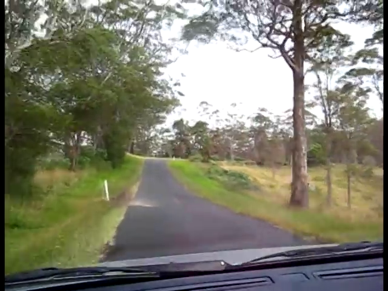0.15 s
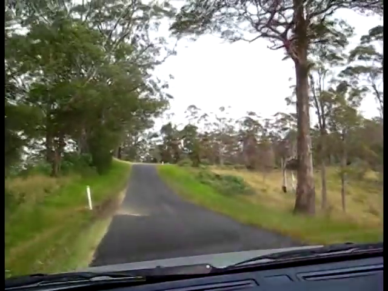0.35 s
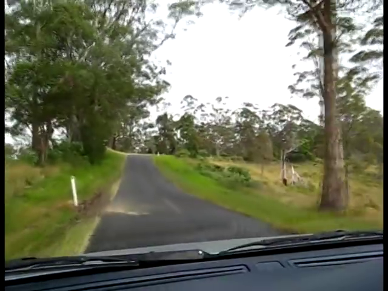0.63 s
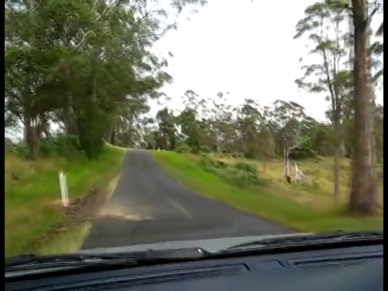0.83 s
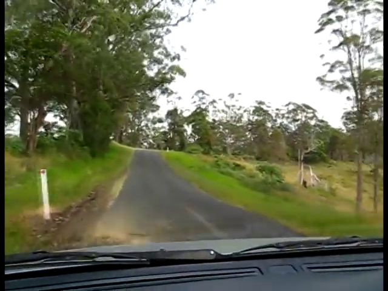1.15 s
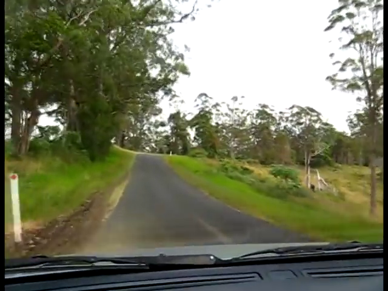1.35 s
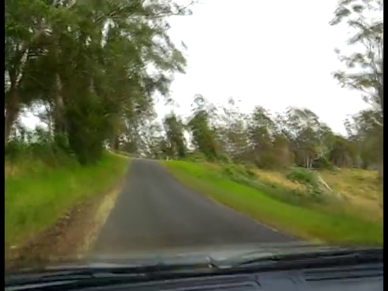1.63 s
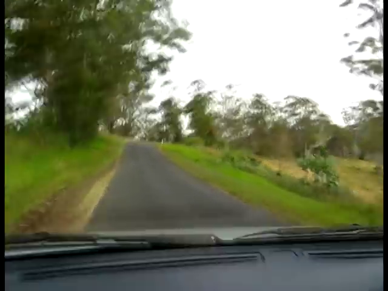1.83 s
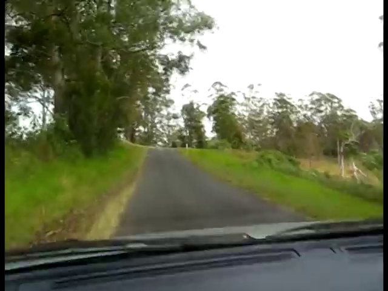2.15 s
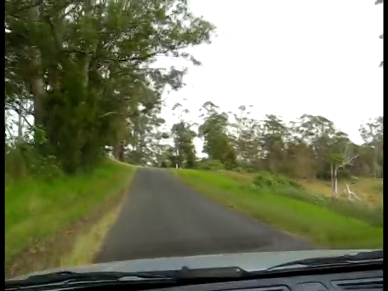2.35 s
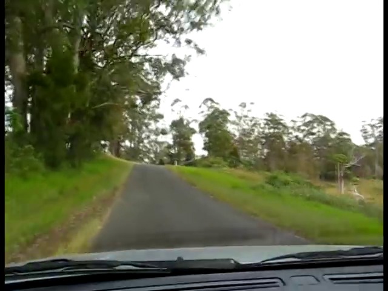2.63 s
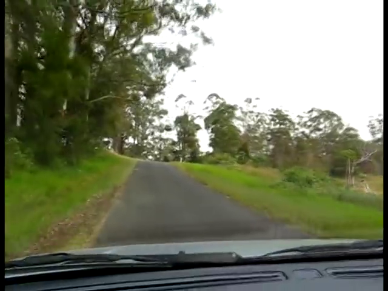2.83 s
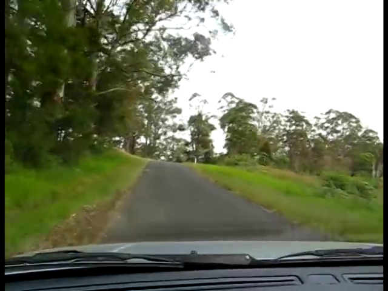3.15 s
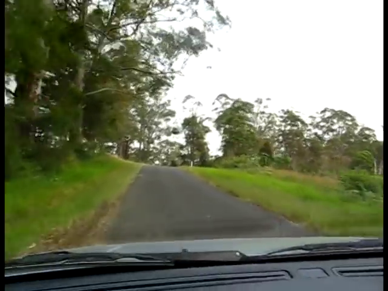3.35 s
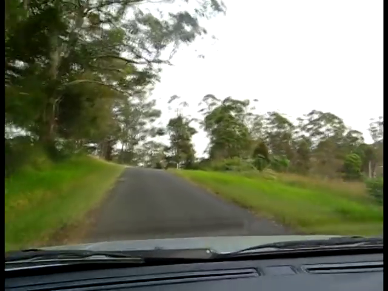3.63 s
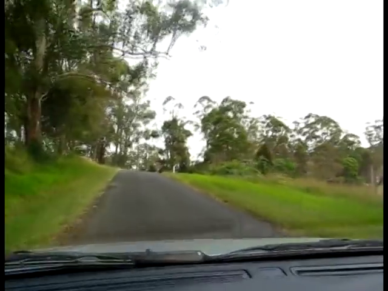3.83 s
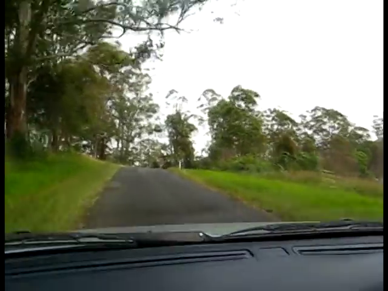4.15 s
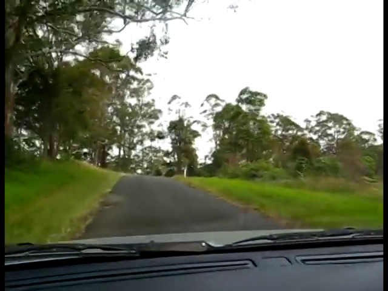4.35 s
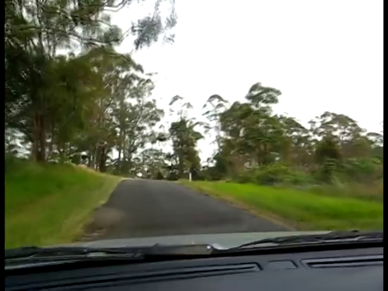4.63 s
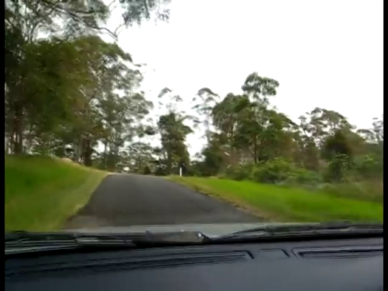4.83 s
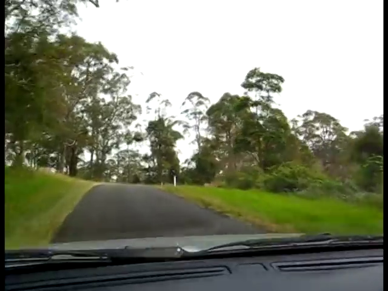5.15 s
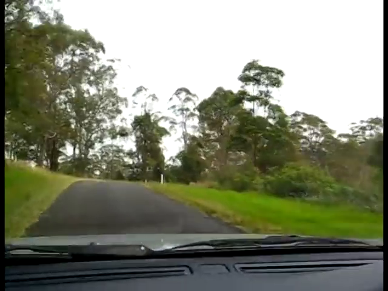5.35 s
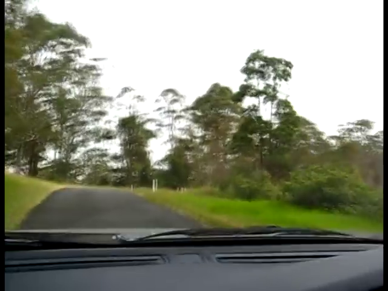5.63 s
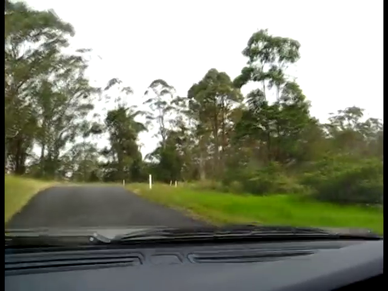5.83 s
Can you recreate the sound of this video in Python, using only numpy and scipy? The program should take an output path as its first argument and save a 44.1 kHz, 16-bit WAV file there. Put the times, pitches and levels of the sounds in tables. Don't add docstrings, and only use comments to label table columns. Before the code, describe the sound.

Inside a car on a rough country road, heavy tyre rumble and engine hum, a sharp stone snap, then rattling trim knocks.

```python
import sys
import numpy as np
from scipy import signal
from scipy.fft import rfft, irfft, next_fast_len
from scipy.io import wavfile
from scipy.ndimage import uniform_filter1d, map_coordinates

SR = 44100
rng = np.random.default_rng(int(sys.argv[2]) if len(sys.argv) > 2 else 0)


def to_wav(sig):
    pcm = np.clip(np.atleast_2d(sig), -1, 1) * 32767
    pcm = np.round(pcm).astype(np.int16)
    wavfile.write(sys.argv[1], SR, pcm.T)


def ratio_of_db(decibels):
    return 10 ** (np.asarray(decibels, float) / 20)


N = 263963
TIME_S = np.arange(N) / SR
HIT_S = np.arange(SR // 8) / SR


def unit(x):
    return x / np.sqrt(np.mean(x ** 2) + 1e-20)


def curves(rows):
    s, *cols = np.transpose(rows)
    return [np.interp(TIME_S, s, c) for c in cols]


def wobble(rate):
    knots = rng.standard_normal(int(N * rate / SR) + 4)
    return map_coordinates(knots, [np.arange(N) * rate / SR])


def humps(s, height, half_s):
    return np.sum(height * np.exp(-((TIME_S - s) / half_s) ** 2), axis=0)


def rush(spectrum, patchy_db):
    z = signal.stft(rng.standard_normal(N + 512), nperseg=512)[2]
    field = uniform_filter1d(rng.standard_normal(z.shape), 6, 0)
    field = uniform_filter1d(field, 10, 1)
    patchy = signal.istft(z * ratio_of_db(patchy_db * unit(field)), nperseg=512)[1][:N]
    m = next_fast_len(N + 8192)
    hz, db = np.transpose(spectrum)
    gain_db = np.interp(np.log(np.fft.rfftfreq(m, 1 / SR) + 1), np.log(hz + 1), db)
    return unit(irfft(rfft(patchy, m) * ratio_of_db(gain_db), m)[:N])


def ring(modes, smear, rise):
    hz, db, t60 = np.transpose(modes)[:, :, None]
    strength, detune = rng.standard_normal((2, len(hz), 1))
    drift = smear * np.cumsum(rng.standard_normal((len(hz), len(HIT_S))), axis=1)
    level = ratio_of_db(db + 1.5 * strength - 60 * HIT_S / np.maximum(t60, 0.005))
    tones = level * np.sin(2 * np.pi * hz * (1 + 0.017 * detune) * HIT_S + drift)
    return np.sum(tones, axis=0) * (1 - np.exp(-HIT_S / rise))


def place(out, s, hit):
    out[round(s * SR):][:len(hit)] += hit


# (time [s], depth [dB])
DUCKS = [(0.15, 8), (0.39, 15.5), (1.2, 2.5), (1.5, 4.5), (1.69, 3.5), (1.766, 8), (2.034, 8.5), (2.385, 2),
         (2.83, 1), (3.24, 2.5), (3.84, 3), (4.482, 4), (5.179, 5), (5.398, 6), (5.491, 4.5), (5.71, 5)]


def ducking():
    attack_s, hold_s, recover_db_per_s = 0.0027, 0.046, 39.5
    s, depth_db = np.transpose(DUCKS)[:, :, None]
    since = TIME_S - s
    left_db = depth_db - recover_db_per_s * np.maximum(since - hold_s, 0)
    return -np.sum(np.clip(since / attack_s, 0, 1) * np.maximum(left_db, 0), axis=0)


# (frequency [Hz], density [dB per Hz])
SELF_NOISE = [(1500, -27.5), (3000, -3.5), (5000, -1), (6500, -10), (8000, -33), (10000, -60)]


def self_noise():
    return ratio_of_db(-60.5) * rush(SELF_NOISE, patchy_db=2.0)


# (time [s], level [dB], half length [s])
GRAVEL = [(0.14, -58, .02), (1, -45, 0.083), (1.422, -43, 0.045), (1.69, -38.5, 0.06), (1.745, -45, .025),
          (1.983, -39, 0.083), (2.29, -43.5, 0.08), (4.421, -53, 0.052), (4.85, -44.5, 0.16),
          (5.03, -54, .04), (5.385, -42.5, 0.033)]


def gravel():
    s, db, half_s = np.transpose(GRAVEL)[:, :, None]
    crunch = ratio_of_db(3.4 * wobble(150)) * rush([(900, -38.5)] + HISS[1:], patchy_db=0.5)
    return humps(s, ratio_of_db(db), half_s) * unit(crunch)


# (time
# [s], level [dB], frequency [Hz], t60 [s])
PINGS = [(.3966, -11, 850, 0.028), (.3958, -27, 5400, .012), (0.397, -23, 4000, .012),
         (.4006, -29, 5000, .009), (0.9443, -23, 2080, .035), (.9448, -24.5, 3130, 0.024),
         (0.9458, -30, 2650, .035), (.9452, -49, 7800, .06), (.9535, -32, 3220, 0.027),
         (.951, -26, 1800, .035), (.96, -31.5, 2300, 0.046), (1.6804, -24, 1800, .05),
         (1.7222, -27, 2250, .025), (1.7235, -41, 5000, .02), (1.7508, -10, 477, 0.026),
         (1.751, -22, 1900, 0.027), (1.7555, -29, 3270, 0.032), (1.765, -33, 1760, 0.035),
         (5.3875, -31, 1810, 0.036)]


def pings():
    out = np.zeros(N + SR)
    for s, db, hz, t60 in PINGS:
        place(out, s, ring([(hz, db, t60)], smear=0.083, rise=0.0014))
    return out[:N]


# (time [s], level [dB], frequency [Hz], t60 [s])
PANEL = [(.133, -21, 810, .02), (.1418, -17, 750, 0.018), (1.338, -17, 910, 0.026),
         (1.605, -21, 900, 0.034), (1.618, -21.5, 966, 0.072), (1.6385, -8.5, 850, 0.025),
         (1.661, -12, 930, 0.026), (2.366, -17, 790, 0.018), (5.177, -18.5, 790, 0.025)]


def door_panel():
    out = np.zeros(N + SR)
    for s, db, hz, t60 in PANEL:
        place(out, s, ring([(hz, db, t60)], smear=0.012, rise=0.0006))
    return out[:N]


# (time [s], peak [dB], thud [dB], tick [dB], loudest part [Hz])
RATTLE = [(0.134, -32, 8, -18, 1950), (0.921, -31.5, 4, -19, 2410), (0.9455, -29, -4, -19.5, 2150),
          (0.9504, -31, -2, -19, 2250), (0.9565, -34, -1, -25, 3270), (0.966, -34, -2, -18, 2320),
          (0.998, -33, 14, -22, 1980), (1.066, -36, 20, -12, 3100), (1.15, -45, 5, -18, 1850),
          (1.338, -39, 16, -25, 1680), (1.437, -32, 15, -12.5, 1590), (1.606, -51, 24, -24, 1630),
          (1.6398, -28, 6, -12.5, 2180), (1.6435, -31, 4, -14, 3400), (1.6608, -27, 12, -15.5, 2460),
          (1.6728, -29.5, 24, -11, 2570), (1.677, -29, 0, -17, 2700), (1.6809, -25, 9, -22, 1760),
          (1.6862, -34, 3, -18, 2500), (1.6985, -28, 6, -26, 1820), (1.723, -30, -9, -7, 2280),
          (1.752, -29, -5, -15, 1890), (1.7552, -27, 8, -11.5, 1810), (1.763, -37, -6, -17, 3270),
          (1.803, -35, 12, -18, 1390), (1.8847, -31, -6, -11, 1830), (1.898, -40, -6, -10, 3180),
          (1.9414, -30.5, -1, -21, 1610), (1.9776, -31, -4, -18, 1750), (2.0084, -29, 0.5, -16, 1940),
          (2.366, -38, 26, -16, 1600), (5.177, -34, 10, -12.5, 1620), (5.386, -30, -2, -20, 1770)]
# (frequency [Hz], level [dB])
TRIM = [(1800, 0.5), (2250, -1.5), (2750, -7), (3250, -1.5), (3900, -10.5)]
# (frequency [Hz], level [dB])
THUD = [(250, 7), (450, 4.5), (700, 7), (900, 2), (1100, -13.5)]
# (frequency [Hz], density [dB per Hz])
TICK = [(1200, -17.5), (2200, 2.5), (4200, 4.5), (5700, -2.5), (7500, -10.5), (9000, -28.5), (10500, -35.5),
        (11500, -120)]


def trim_knocks():
    out = np.zeros(N + SR)
    t60 = 0.051
    grit = np.pad(rush(TICK, patchy_db=-2.5), (0, SR))
    tick_shape = ratio_of_db(-60 * HIT_S / t60) * (1 - np.exp(-HIT_S / 0.0014))
    for s, db, thud_db, tick_db, part_hz in RATTLE:
        trim_modes = [(hz, level, t60) for hz, level in TRIM + [(part_hz, 4)]]
        thud_modes = [(hz, level, 0.51 * t60) for hz, level in THUD]
        rattle = ring(trim_modes, smear=0.085, rise=0.0015)
        thud = ratio_of_db(thud_db + 0.5) * ring(thud_modes, smear=0.004, rise=0.00049)
        tick = ratio_of_db(tick_db + 13.5) * grit[round(s * SR):][:len(HIT_S)] * tick_shape
        place(out, s - 0.001, ratio_of_db(db - 10.0) * (rattle - thud + tick))
    return out[:N]


# (time [s], peak [dB])
SNAP = [
    (0.395, -18),
    (0.3971, -17),
    (0.4006, -21),
]
# (frequency [Hz], level [dB], t60 [s])
PAN = [(1870, -11, 0.023), (2520, -9.5, 0.018), (3100, -8, 0.014), (3760, -3, 0.0099), (4100, -7, 0.0086),
       (5250, -11, 0.008), (5940, -15, 0.008), (7060, -17, 0.009)]
# (frequency
# [Hz], level [dB], t60 [s])
PAN_BODY = [(850, -17, 0.025), (1180, -12, 0.016), (1306, -15, 0.041)]


def stone():
    out = np.zeros(N + SR)
    place(out, SNAP[0][0], -ring(PAN_BODY, smear=0.004, rise=0.0011))
    for s, db in SNAP:
        skin = ring(PAN, smear=0.059, rise=0.00063)
        carrier = np.sin(2 * np.pi * 7500 * HIT_S)
        spit = ratio_of_db(-22 - 60 * HIT_S / 0.0081) * rng.standard_normal(len(HIT_S)) * carrier
        place(out, s, ratio_of_db(db - 2.0) * (skin + spit))
    return out[:N]


# (time [s], crankshaft turns [Hz], throttle [dB])
CRANK = [(0.0, 25.0, -5), (0.8, 25.6, -4), (1.6, 25.1, -6), (2.0, 27, -6), (2.3, 29.8, -4), (2.8, 32.6, -1),
         (3.05, 34.6, 0), (4.0, 34.8, 0), (4.8, 34.5, 0), (5.2, 34.5, 0), (5.6, 32.5, -7), (6.0, 31.2, -7)]
# (multiple of the turns, level [dB])
ORDERS = [(2, -28.5), (3, -44), (4, -28), (6, -35.5), (8, -39.5), (10, -41), (11, -36), (12, -37.5)]
# (frequency [Hz], width [Hz], lift [dB])
BOOM = [(124, 20, 4), (400, 89, 7)]


def engine():
    turns_hz, throttle_db = curves(CRANK)
    angle = 2 * np.pi * np.cumsum(turns_hz) / SR
    hum = np.zeros(N)
    for k, db in ORDERS:
        boom_db = sum(lift_db / (1 + (2 * (k * turns_hz - hz) / width_hz) ** 2)
                      for hz, width_hz, lift_db in BOOM)
        pull_db = throttle_db * (2.1 if k > 9 else 0.063)
        unsteady_db = 1.5 * wobble(6) + 2 * wobble(20)
        tone = np.sin(k * angle + 0.45 * wobble(5))
        hum += ratio_of_db(db + boom_db + pull_db + unsteady_db) * tone
    return hum * ratio_of_db(ducking() + 2.5)


# (time [s], floor heave [dB], body shudder [dB], half length [s])
BUMPS = [(0.145, 10, -0.5, 0.042), (0.336, 5.5, 3.5, 0.046), (0.653, 5, 3.5, 0.04), (0.98, -1, 7, 0.017),
         (1.03, 0.5, 1, .04), (1.292, 4, 1, 0.042), (1.494, 5, 0.5, 0.03), (1.644, 7, 1.5, 0.019),
         (1.69, 6, 7, 0.0088), (1.94, 7.5, 0.5, 0.065), (2.032, 16, 0.5, 0.031), (2.336, 5.5, 2, 0.052),
         (2.492, -5, 5.5, 0.024), (3.182, 3, 0.5, 0.026), (3.31, -4, 4.5, 0.024), (3.382, 4.5, -5.5, 0.033),
         (3.5, 15, -2, 0.02), (3.99, 1.5, -4.5, 0.046), (4.46, -1.5, 0, .03), (4.794, 4.5, 0, 0.13),
         (4.946, -1, 7.5, 0.017), (5.146, 3, 5, 0.029), (5.464, 6.5, 2, 0.086), (5.767, 7, 3.5, 0.025),
         (5.88, 0, 0, .08), (3.504, -1.5, 1, 0.16), (2.607, 1, -4, 0.072), (5.985, -12, 8, 0.017),
         (0.047, -5, -2, 0.09), (1.1, 0.5, 1, 0.091), (3.56, -0.5, -1.5, 0.088), (4.25, -0.5, 1.5, 0.091),
         (5.02, 0, -1, .07)]


def bumps():
    s, heave_db, shudder_db, half_s = np.transpose(BUMPS)[:, :, None]
    return humps(s, heave_db, half_s), humps(s, shudder_db, half_s)


# (time [s], coarseness [dB])
ROAD = [(0.0, -0.5), (0.6, 0), (1.1, 0), (1.55, 0), (2.2, 0.5), (2.8, 2), (3.3, 2), (3.75, 2.5), (4.0, 0),
        (4.4, 3.5), (4.85, 0), (5.35, 1.5), (5.6, -2), (5.99, 1.5)]
# (level [dB], follows the surface [dB/dB], follows the ducking [dB/dB])
PATHS = [
    (-19.5, -0.66, 0.67),
    (-19, 0.79, 0.83),
    (-29.5, 1.2, 0.74),
    (-42.5, .9, 0.52),
]
# (frequency [Hz], density [dB per Hz])
RUMBLE = [(7, -26.5), (12, -14.5), (24, -2), (32, 1), (41, 5), (50, -1), (60, -6.5), (90, -5), (120, -29),
          (200, -120)]
# (frequency [Hz], density [dB per Hz])
DRONE = [(53, -32), (90, 0.5), (140, 1), (168, -2.5), (221, -7.5), (257, -5), (313, -10), (376, -8),
         (423, -11), (480, -15), (620, -48.5), (1060, -120)]
# (frequency [Hz], density [dB per Hz])
ROAR = [(280, -34), (480, -5), (511, -1), (591, 2.5), (640, 0), (839, 3.5), (971, 0.5), (1060, -4.5),
        (1200, -8.5), (1350, -15.5), (1690, -46.5), (2860, -120)]
# (frequency [Hz], density [dB per Hz])
HISS = [(760, -32.5), (1300, -1.5), (1600, -1), (1910, -7), (2420, -9.5), (2650, -12.5), (3600, -14.5),
        (5000, -25), (6400, -31.5), (7500, -32), (8500, -38.5), (10500, -39.5), (10900, -52.5),
        (20000, -51.5)]


def road():
    (coarse_db,) = curves(ROAD)
    duck_db = ducking()
    rumble_db, drone_db, roar_db, hiss_db = [
        db + follow * coarse_db + duck * duck_db for db, follow, duck in PATHS]
    surface = wobble(30)
    heave_db, shudder_db = bumps()
    rumble_db = rumble_db + heave_db - 1.5
    drone_db = drone_db + shudder_db + 1.15 * wobble(14) - 0.54 + 0.89 * surface
    roar_db = roar_db - 0.42 + 1.1 * surface + 0.42 * wobble(70)
    hiss_db = hiss_db - 0.27 + 0.64 * surface + 0.12 * wobble(90)
    rumble = ratio_of_db(rumble_db) * rush(RUMBLE, patchy_db=-1.0)
    drone = ratio_of_db(drone_db) * rush(DRONE, patchy_db=0.73)
    roar = ratio_of_db(roar_db) * rush(ROAR, patchy_db=0.87)
    hiss = ratio_of_db(hiss_db) * rush(HISS, patchy_db=1.0)
    return rumble + drone + roar + hiss


def scene():
    knocks = pings() + door_panel() + trim_knocks() + stone()
    return (self_noise() + gravel() + knocks + engine() + road())[None]


def band_limit(x):
    return signal.sosfilt(signal.butter(12, 15800, fs=SR, output="sos"), x)


def record(dry):
    power = np.abs(uniform_filter1d(dry ** 2, round(0.04 * SR)))
    evened = ratio_of_db(2.0) * dry / (1 + power / 0.045) ** 0.33
    squeezed = evened / (1 + np.abs(evened / 0.85) ** 4) ** (1 / 4)
    dull = signal.sosfiltfilt(signal.butter(2, 6500, fs=SR, output="sos"), squeezed)
    dull = signal.sosfiltfilt(signal.butter(10, 11000, fs=SR, output="sos"), dull)
    dull = dull * np.minimum(TIME_S / 0.002, 1)
    converter_hiss = ratio_of_db(-95.0) * rng.standard_normal(dry.shape)
    mix = dull + converter_hiss - 0.0063
    return band_limit(mix)


dry = scene()
out = record(dry)
to_wav(out)
```